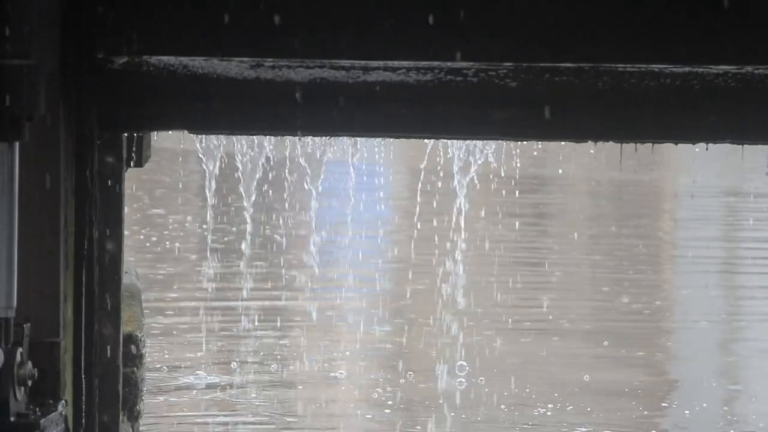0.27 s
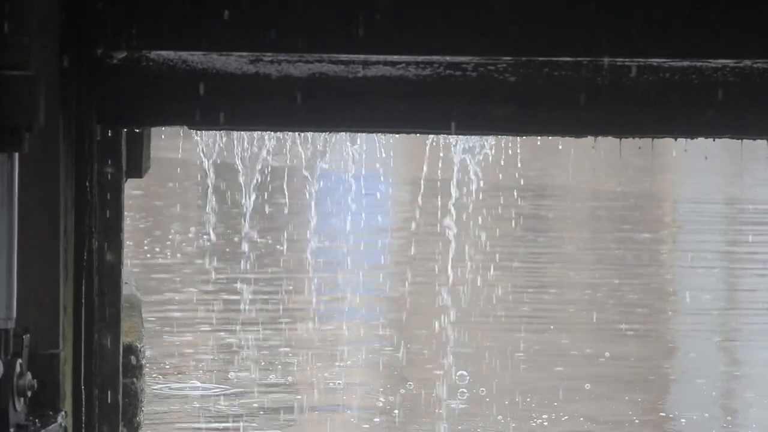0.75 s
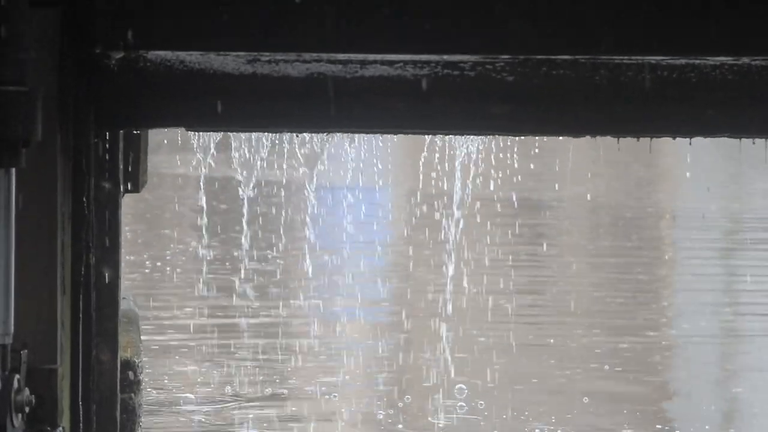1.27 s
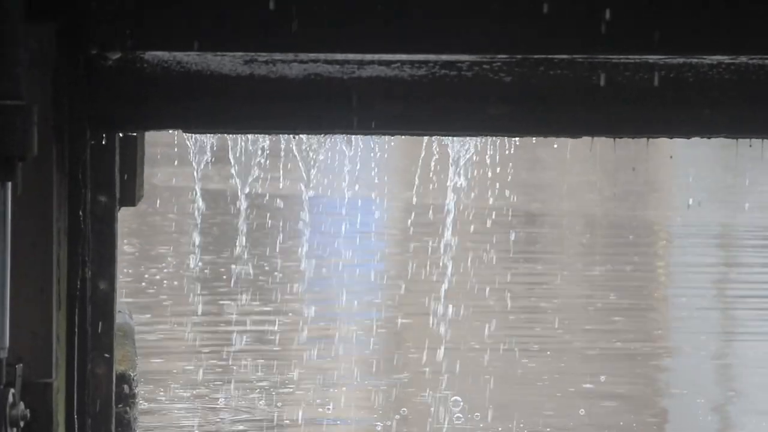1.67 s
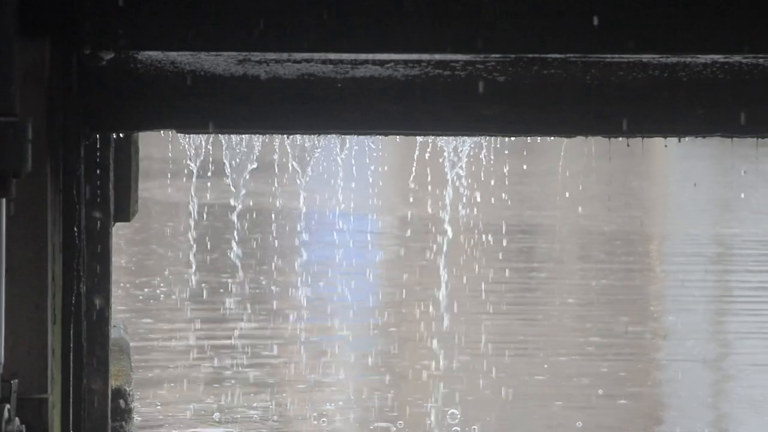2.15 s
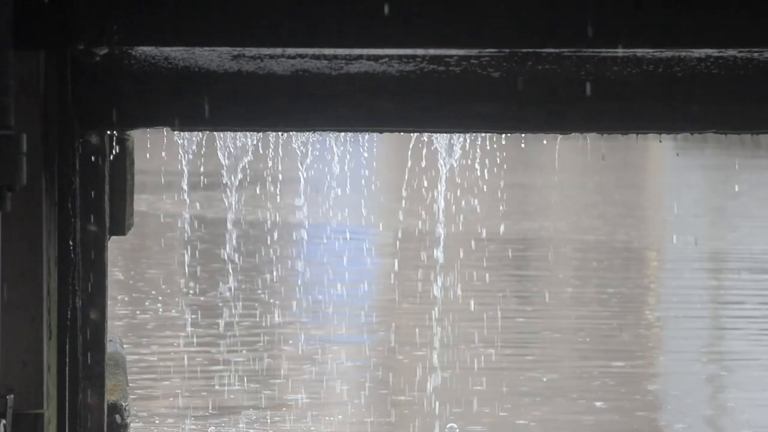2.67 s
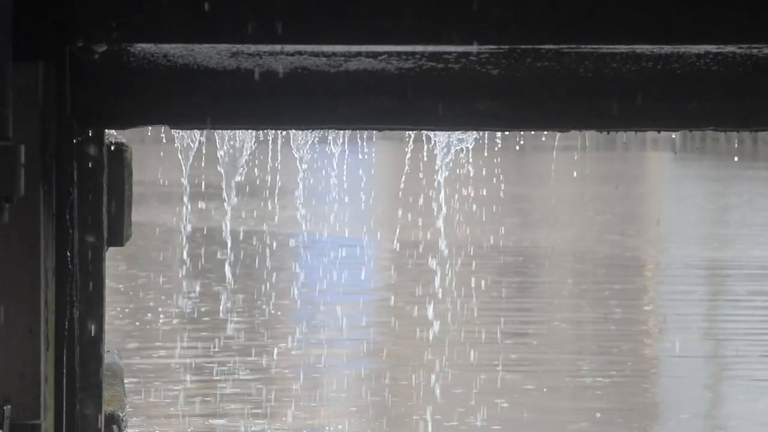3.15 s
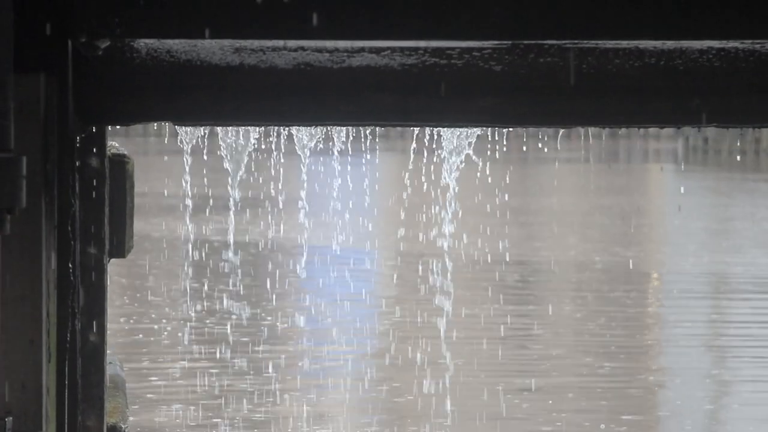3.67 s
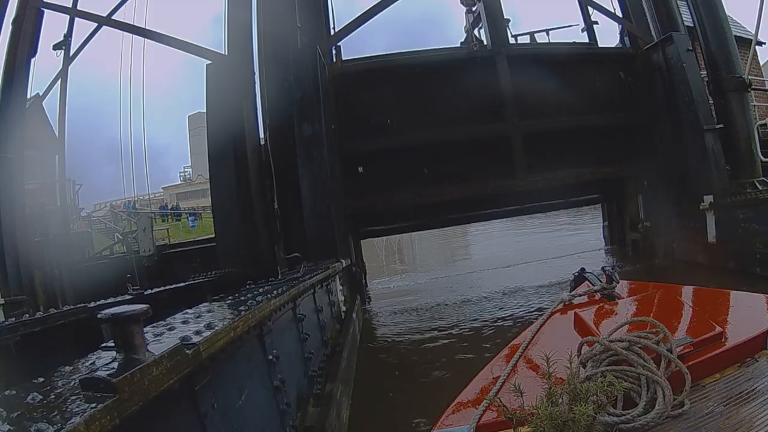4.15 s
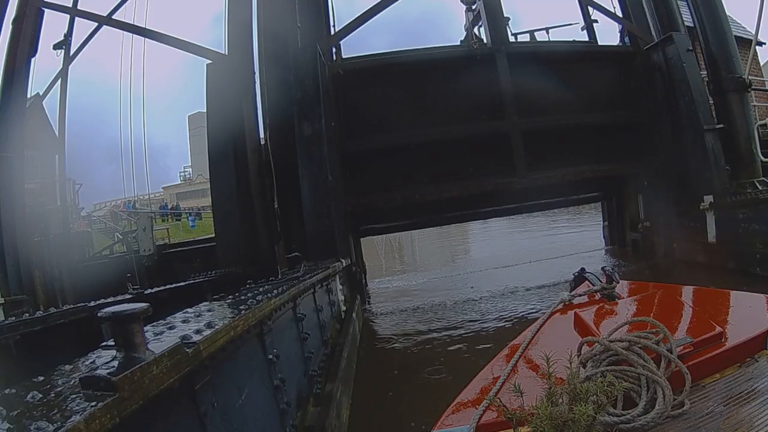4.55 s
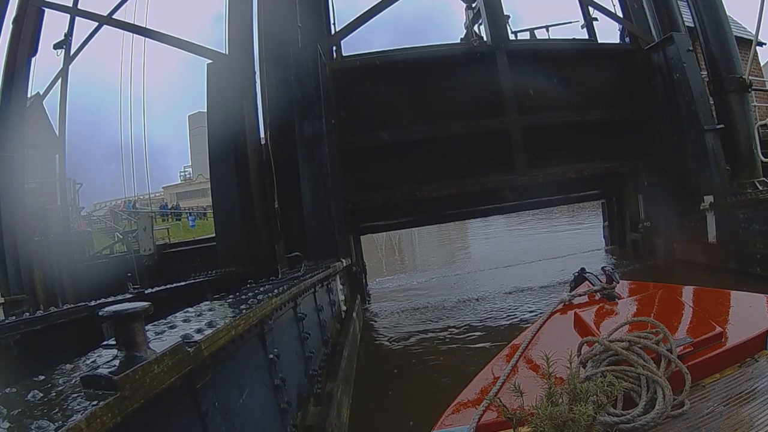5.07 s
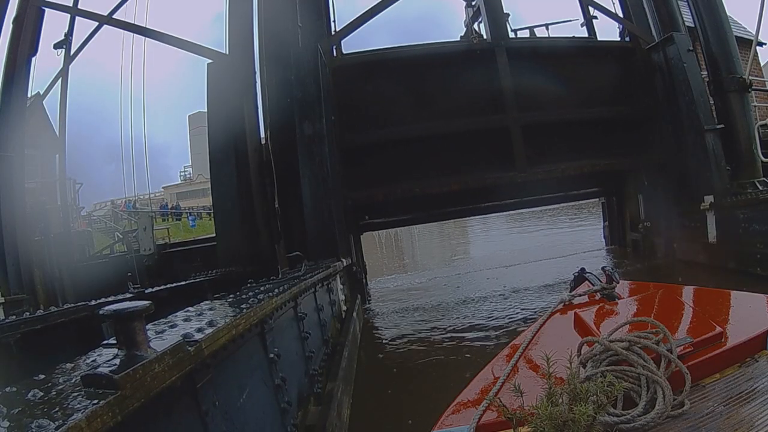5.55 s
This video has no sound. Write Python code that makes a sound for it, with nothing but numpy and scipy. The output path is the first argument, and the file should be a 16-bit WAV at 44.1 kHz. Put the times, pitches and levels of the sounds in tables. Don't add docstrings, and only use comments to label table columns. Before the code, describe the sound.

Hissing, churning water with sharp drop plinks and a rising steady motor hum, suddenly replaced at four seconds by muffled distant water and fading hum.

```python
import sys
import numpy as np
from scipy import signal
from scipy.fft import rfft, irfft, next_fast_len
from scipy.io import wavfile
from scipy.ndimage import uniform_filter1d, map_coordinates

SR = 44100
rng = np.random.default_rng(int(sys.argv[2]) if len(sys.argv) > 2 else 0)


def output_pcm(signal):
    pcm = np.clip(np.atleast_2d(signal).T, -1, 1) * 32767
    wavfile.write(sys.argv[1], SR, np.round(pcm).astype(np.int16))


def volts_from_decibels(level):
    exponent = np.asarray(level, float) / 20
    return 10 ** exponent


N = 255780
T = np.arange(N) / SR

CUT_S, FADE_S = 4.143, 0.014

# frequency in Hz, density in dB per Hz.
CHURN_NEAR = [(15, -40.5), (25, -18), (42, -8), (58, -2.5), (76, -10), (110, -6.5), (170, -2), (235, -1),
              (300, -5), (400, -10.5), (550, -12.5), (900, -25), (1500, -63)]
SPRAY_NEAR = [(300, -29), (600, 0), (900, -1), (1500, -2.5), (1900, -5), (2800, -6), (3200, -9),
              (5500, -11.5), (6600, -14), (8300, -12.5), (10500, -21), (13500, -22.5), (15000, -27),
              (16500, -30)]
CHURN_FAR = [(15, -40), (28, -10), (50, -3), (85, -5.5), (150, 0.5), (290, -0.5), (380, -6.5), (580, -4.5),
             (680, -7), (800, -5), (1050, -8), (1350, -14), (1800, -24), (2300, -58)]
SPRAY_FAR = [(1400, 0.5), (2200, -3), (2450, -2), (3000, -12.5), (3750, -4.5), (4900, -11.5), (5400, -7),
             (6100, -11.5), (6700, -8), (7400, -13.5), (8300, -19.5), (10100, -19), (11500, -15.5),
             (12800, -29)]
FLOW_NEAR_DB, FLOW_FAR_DB = (-35, -36.5), (-47, -53)

# start in seconds, peak level in dB, ring frequency in Hz.
CLOSE_DROPS = [(0.163, -24, 7730), (0.414, -24, 3360), (0.4182, -19, 2830), (0.4214, -22, 4830),
               (0.4254, -19, 3470), (0.431, -20, 3060), (1.8751, -27.5, 7840), (1.1298, -26, 7210),
               (1.2067, -21.5, 7900), (1.2404, -23, 2830), (1.5993, -25, 3330), (1.665, -17, 1440),
               (2.2218, -18.5, 4260), (2.2218, -20.5, 8140), (2.2305, -24, 4600), (2.233, -21, 4000),
               (2.3092, -23, 1510), (2.8612, -18, 3150), (2.865, -15, 1400), (2.8654, -24, 5600),
               (2.8662, -30, 13200), (2.8764, -28, 2450), (3.441, -24, 2700), (3.4516, -29, 12400),
               (3.507, -27, 5530), (3.511, -27, 5820), (4.0454, -26, 3170), (4.6178, -29.5, 2500),
               (5.5283, -49, 11200), (5.7354, -41, 1226)]
# pitch ratio to the ring, level in dB relative to it.
CRACK = [(1.28, -5.5), (1.75, -12)]
TICK_HZ, TICK_DB, TICK_CYCLES = 12000, -10, 2.6
SPATTER_DB, SPATTER_SPREAD_DB, SPATTER_HZ, SPATTER_OCTAVES = -30, 1.5, 1286, 2.9

PUMP_HZ, MOTOR_HZ, PANEL_HZ = 246.77, 299.87, 349.8
# order (multiple of the base frequency), level in dB rms.
PUMP_NEAR = [(1, -40), (2, -50), (3, -29), (4, -53), (5, -55)]
PUMP_FAR = [(1, -39), (2, -56), (3, -44), (4, -66), (5, -64), (6, -71)]
MOTOR_NEAR = [(2, -49), (3, -52), (4, -59), (8, -59), (9, -62), (11, -63), (22, -65), (23, -68), (24, -62),
              (25, -65), (26, -66), (27, -70), (32, -66), (34, -71)]
MOTOR_FAR = [(2, -58), (3, -54), (5, -73), (6, -72), (8, -75), (9, -79), (10, -78), (14, -80), (22, -81),
             (23, -80), (24, -80)]
SLOT_DB, SWELL_DB, SWELL_S = -27.5, 15, 1.31
PANEL_DB, PANEL_GROWS = -35.5, 1.1
THIRD_DB, THIRD_TOP_S, THIRD_SAG = -28.5, 2.15, 0.64
DECK_SLOT_DB, DECK_SLOT_FALL = -41, 6.1
DECK_PANEL_DB, DECK_THIRD_DB, DECK_THIRD_FALL = -60.5, -42.5, 1.4

# start in seconds, level in dB rms.
SQUEAKS = [
    (4.642, -59.5),
]
SQUEAK_S, SQUEAK_HZ, SQUEAK_FALL_HZ = .045, 2280, 480

# frequency in Hz, density in dB per Hz.
CAMERA_HISS = [(8000, -30), (11000, -6), (12800, 0), (14000, 2), (16500, 1)]
WHINE_HZ, SCAN_HZ = 13750, 52.6


def unit(x):
    return x / np.sqrt(np.mean(x ** 2) + 1e-20)


def wobble(rate):
    knots = rng.standard_normal(int(N * rate / SR) + 4)
    return map_coordinates(knots, [T * rate])


def coloured(x, points, lo_hz, hi_hz):
    m = next_fast_len(N + 8192)
    hz = np.fft.rfftfreq(m, 1 / SR)
    f, db = np.transpose(points)
    gain_db = np.interp(np.log(hz + 1), np.log(f), db, left=-120, right=-120)
    z = rfft(x, m) * volts_from_decibels(gain_db)
    band = irfft(z * ((hz > lo_hz) & (hz < hi_hz)), m)[:N]
    return irfft(z, m)[:N] / np.std(band)


def patchy(depth_db):
    z = signal.stft(rng.standard_normal(N), nperseg=512)[2]
    field = uniform_filter1d(rng.standard_normal(z.shape), size=8, axis=0)
    field = uniform_filter1d(field, size=8, axis=1)
    noise = signal.istft(z * volts_from_decibels(depth_db * unit(field)), nperseg=512)[1]
    return unit(noise[:N])


def pings(s, peak, hz, cycles):
    t = np.arange(160) / SR
    turns = hz[:, None] * t
    envelope = np.exp(-turns / cycles) * (1 - np.exp(-turns / 0.55))
    ring = peak[:, None] * np.sin(2 * np.pi * turns) * envelope
    at = np.round(s * SR).astype(int)[:, None] + np.arange(len(t))
    return np.bincount(at.ravel(), ring.ravel(), N + len(t) + 1)[:N]


def droplets(count, spread_db, cycles):
    u = rng.random((count, 3))
    hz = 900 + 14000 * u[:, 2] ** 1.31
    size_db = np.minimum(-spread_db * np.log(1 - u[:, 1]), 13.5)
    size = volts_from_decibels(size_db) * (hz / 5000) ** 0.73
    return unit(pings(u[:, 0] * (N - 1) / SR, size, hz, cycles))


def water(flow, churn, spray, grain, count):
    churn_db, spray_db = flow
    surge = wobble(9)
    low = volts_from_decibels(churn_db + 0.31 * wobble(7.3)) * coloured(patchy(0.5), churn, 91, 227)
    hiss = patchy(0.76) * volts_from_decibels(0.43 * surge + 0.48 * wobble(29.83))
    fizz = hiss + grain * droplets(count, 2.0, 3.3)
    return low + volts_from_decibels(spray_db) * coloured(fizz, spray, 1540, 15000)


def spatter(count):
    u = rng.random((count, 3))
    s = u[:, 0] * (CUT_S - FADE_S)
    db = SPATTER_DB - SPATTER_SPREAD_DB * np.log(1 - u[:, 1]) / 2
    return np.c_[s, db, SPATTER_HZ * 2 ** (SPATTER_OCTAVES * u[:, 2])]


def splashes():
    s, db, hz = np.r_[CLOSE_DROPS, spatter(count=70)].T
    s = s + .0003
    u = rng.random((len(s), 9))
    cycles = 1.3 + hz[:, None] / 1500
    out = pings(s, volts_from_decibels(db), hz, cycles)
    cracks = (hz > 2000) & (hz < 6000)
    for k, (up, down_db) in enumerate(CRACK):
        out += pings(s + .0006 * u[:, k], volts_from_decibels(db + down_db) * cracks, np.minimum(hz * up, 15000), cycles)
    tick_hz = TICK_HZ * (.9 + .25 * u[:, 8])
    out += pings(s, volts_from_decibels(db + TICK_DB) * (hz < 9000), tick_hz, TICK_CYCLES)
    for k in range(3):
        later = s + .002 + .006 * u[:, 2 + k]
        out += pings(later, volts_from_decibels(db - 13.5), hz * (0.8 + 0.49 * u[:, 5 + k]), cycles)
    return out


def tone(hz, db, drift, flutter_db):
    level = np.sqrt(2) * volts_from_decibels(db + flutter_db * wobble(4.86))
    start = 2 * np.pi * rng.random()
    return level * np.sin(2 * np.pi * hz * T + drift * wobble(2.96) + start)


def machines(hum, pump, motor):
    slot_db, panel_db, third_db = hum
    out = tone(MOTOR_HZ, slot_db, .15, .4)
    out += tone(PANEL_HZ, panel_db, .2, .6)
    out += tone(3 * PUMP_HZ, third_db, .15, .4)
    out += sum(tone(k * PUMP_HZ, db, .2, .6) for k, db in pump if k != 3)
    return out + sum(tone(k * MOTOR_HZ, db, .4, 1.5) for k, db in motor)


def hum_near():
    short_db = SWELL_DB * np.exp(-(T / SWELL_S) ** 2)
    third_db = THIRD_DB - THIRD_SAG * (T - THIRD_TOP_S) ** 2
    return SLOT_DB - short_db, PANEL_DB - PANEL_GROWS * short_db, third_db


def hum_far():
    since = np.abs(T - CUT_S)
    slot_db = DECK_SLOT_DB - DECK_SLOT_FALL * since ** 2
    return slot_db, DECK_PANEL_DB, DECK_THIRD_DB - DECK_THIRD_FALL * since


def squeaks():
    out = np.zeros(N)
    for s, db in SQUEAKS:
        u = np.clip((T - s) / SQUEAK_S, 0, 1)
        turns = SQUEAK_S * u * (SQUEAK_HZ - SQUEAK_FALL_HZ * u / 2)
        out += np.sqrt(2) * volts_from_decibels(db) * np.sin(np.pi * u) * np.sin(2 * np.pi * turns)
    return out


def camera():
    scanning = (T * SCAN_HZ + .75) % 1 < .72
    gate = np.clip(scanning + .05, 0, 1)
    whine = volts_from_decibels(-72.5) * np.sqrt(2) * gate * np.sin(2 * np.pi * WHINE_HZ * T)
    return whine + volts_from_decibels(-74) * coloured(rng.standard_normal(N), CAMERA_HISS, 12000, 15000)


def scene():
    near = water(FLOW_NEAR_DB, CHURN_NEAR, SPRAY_NEAR, grain=0.4, count=9000)
    near += machines(hum_near(), PUMP_NEAR, MOTOR_NEAR)
    far = water(FLOW_FAR_DB, CHURN_FAR, SPRAY_FAR, grain=0.13, count=4000)
    far += machines(hum_far(), PUMP_FAR, MOTOR_FAR)
    moved = np.clip((T - CUT_S) / FADE_S + .5, 0, 1)
    mix = (1 - moved) * near + moved * far + splashes() + squeaks() + camera()
    return mix[None]


def top_cut(x):
    return signal.sosfilt(signal.butter(12, 15700, fs=SR, output="sos"), x)


def record(dry):
    return top_cut(dry)


dry = scene()
out = record(dry)
output_pcm(out)
```